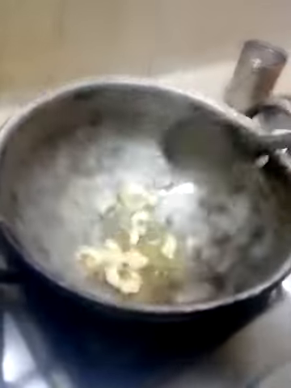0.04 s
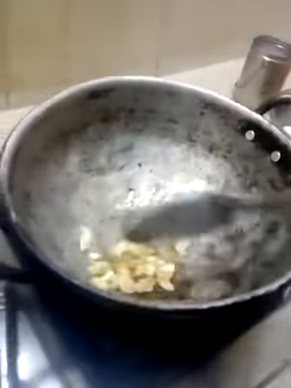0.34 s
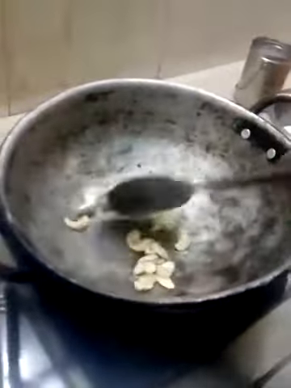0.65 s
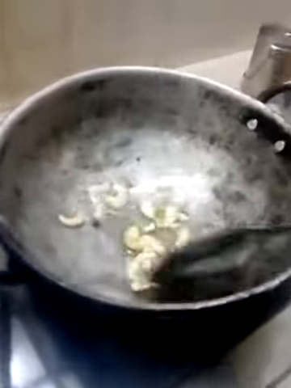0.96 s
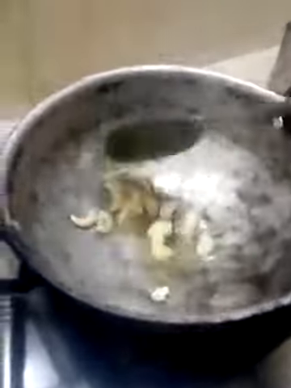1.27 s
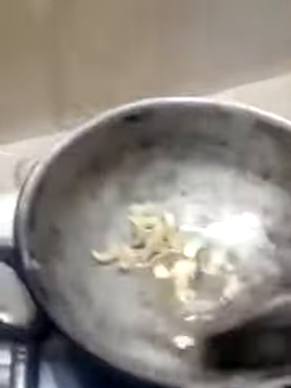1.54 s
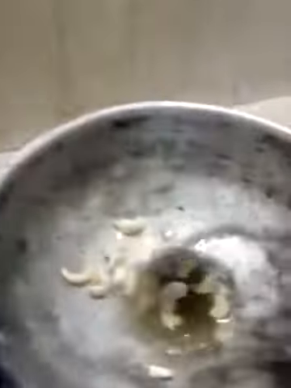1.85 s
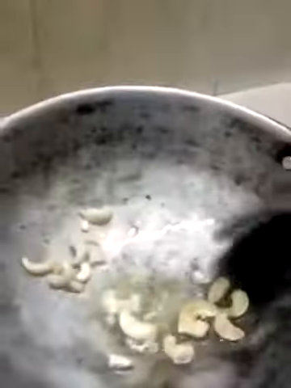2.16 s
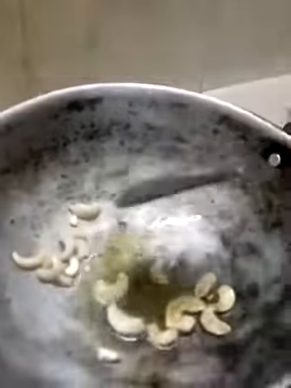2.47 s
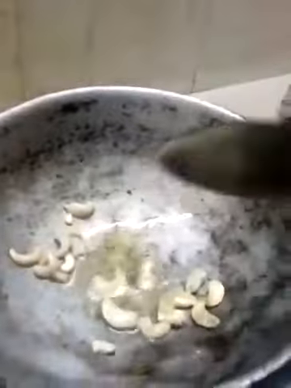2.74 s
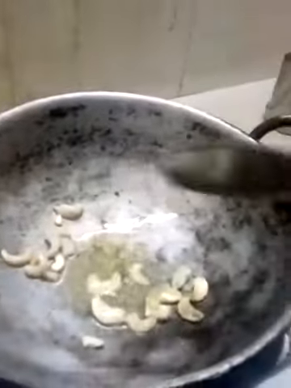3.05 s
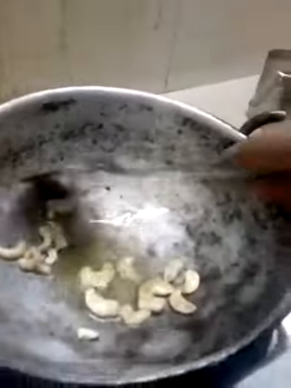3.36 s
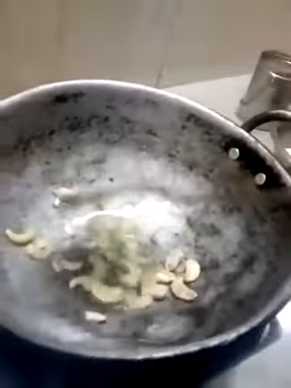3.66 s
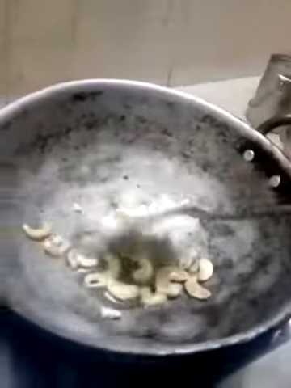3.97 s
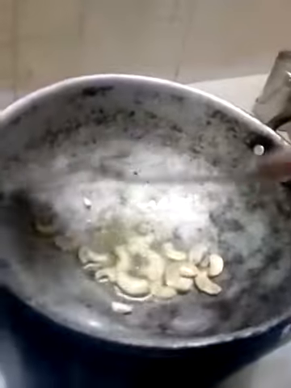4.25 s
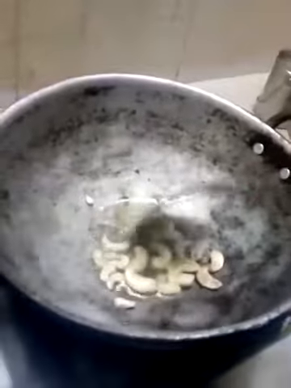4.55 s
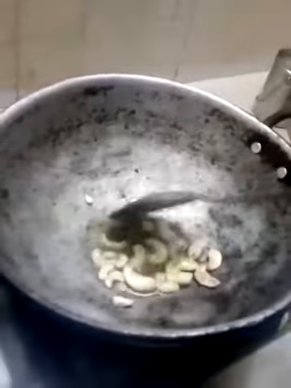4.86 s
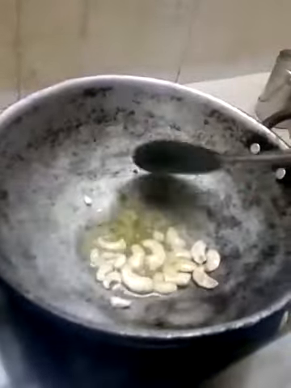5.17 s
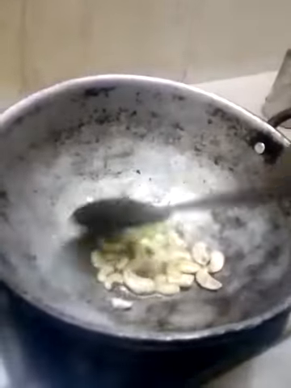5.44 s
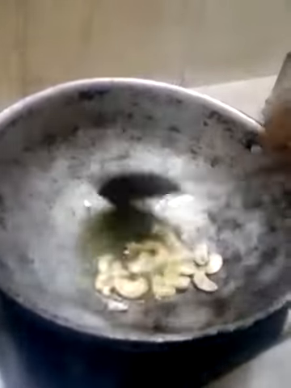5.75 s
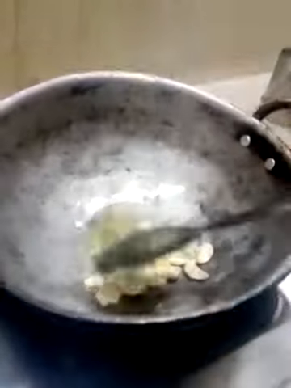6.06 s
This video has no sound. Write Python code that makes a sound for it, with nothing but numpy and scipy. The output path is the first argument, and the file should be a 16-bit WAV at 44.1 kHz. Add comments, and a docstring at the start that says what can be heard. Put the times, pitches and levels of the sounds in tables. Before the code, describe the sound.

Cashews sizzle and spit in hot oil while a steel spoon clinks and scrapes against a metal wok.

```python
"""Cashews sizzle in a little oil in a metal wok, close by in a small kitchen.
Tiny steam bubbles burst in the oil, and drops of moisture spit: a sharp pop, then a short
pitched fizz of escaping steam. A steel spoon clinks into the pan and scrapes along it.
A few wet whistles of steam sag in pitch. Behind it all are a short echo and a faint hum."""
import sys
import numpy as np
from scipy import signal
from scipy.fft import rfft, irfft, next_fast_len
from scipy.io import wavfile
from scipy.ndimage import map_coordinates

SR = 44100
rng = np.random.default_rng(int(sys.argv[2]) if len(sys.argv) > 2 else 0)


def wav_record(signal):
    """Record a signal, one row per channel, as 16-bit PCM in the file named by sys.argv[1]."""
    frames = np.transpose(np.atleast_2d(signal))
    bounded = np.clip(frames, -1, 1)
    # unit amplitude maps onto the largest positive 16-bit level
    quanta = np.round(bounded * 32767).astype(np.int16)
    wavfile.write(sys.argv[1], SR, quanta)


N = 269451

# How hard the oil fries, and its finest spray. Each row: time in seconds, level in dB.
SIZZLE_LEVELS = [(0, -53), (1.32, -56), (1.5, -33), (1.8, -33), (2.0, -33), (2.38, -38), (2.85, -38.5),
                 (3.15, -39.5), (3.45, -34.5), (4.04, -44), (4.2, -32), (4.5, -35.5), (4.72, -35),
                 (5.2, -32.5), (5.45, -29), (5.62, -25.5), (5.9, -33.5), (6.11, -27.5)]
MIST_LEVELS = [(0, -99), (1.3, -98.5), (1.43, -71), (1.85, -61), (2.45, -66), (3.1, -71.5), (4.0, -76),
               (4.25, -69), (6.11, -70)]
# The tone of the fizz and of the crackles. Each row: frequency in Hz, level in dB.
FIZZ_TONE = [(100, -14), (400, -3.5), (800, -14), (1500, -21.5), (2500, -2), (4000, 1.5), (5500, 10),
             (6600, -5.5), (8500, -15), (11000, -17), (15000, -14.5)]
CRACKLE_TONE = [(300, -39), (800, -12), (1500, 13.5), (3000, -1), (5000, 3), (6800, 3.5), (8500, -3),
                (15000, -28)]


def sizzle(stir):
    """Tiny steam bubbles burst in clumps: a fine fizz, pitched crackles and a thin mist on top."""
    fizz = coloured(grains(rate=12000, spread_db=2.5), FIZZ_TONE) * amp(2.5 * wobble(45))
    mist_tone = [(5000, -63), (8500, 3.5), (10500, 1.5), (15500, 8.5)]
    mist = coloured(grains(rate=3900, spread_db=8), mist_tone) * amp(2.1 * wobble(43))
    crackle, t = np.zeros(N), np.arange(SR // 16) / SR
    for when, size, pitch in rng.random((650, 3)):
        hz = 3400 * 1.75 ** pitch
        click = snap(t, 1.3 * hz, life_s=.0004, grit=.15)
        ping = amp(-14) * snap(t, hz, life_s=.007, grit=.13)
        add(crackle, when * N / SR, amp(-17 * np.sqrt(size)) * (click + ping))
    bubbles = amp(-5) * fizz + amp(-3) * coloured(crackle, CRACKLE_TONE)
    frying = gain_curve(SIZZLE_LEVELS) + amp(-1.5) * stir  # oil swept over hot metal sizzles more
    return frying * bubbles + amp(26) * gain_curve(MIST_LEVELS) * mist


# The loudest spits of the oil. Each row: start in seconds, pop level in dB, fizz pitch in Hz.
LOUD_SPITS = [(.703, -30, 4400), (1.8643, -16.5, 6060), (1.8948, -14, 5670), (1.9445, -11.5, 5250),
              (1.9717, -10, 4510), (2.2469, -13.5, 4540), (2.4013, -18, 4570), (2.4554, -15.5, 4650),
              (2.4901, -18, 2440), (2.5893, -25, 5580), (2.7045, -13.5, 3810), (2.801, -17.5, 2597),
              (2.8736, -11.5, 3210), (2.9734, -10, 5350), (3.025, -19, 5150), (3.1718, -15, 5370),
              (3.1834, -13, 5420), (3.3763, -14, 5430), (3.6546, -19, 4800), (3.7552, -24, 4030),
              (3.8543, -18, 6700), (4.074, -16, 5410), (4.139, -13.5, 5190), (4.2721, -13.5, 5880),
              (4.4759, -18.5, 5920), (4.8912, -11, 5480), (4.9547, -10.5, 5840), (4.9953, -11.5, 3670),
              (5.0463, -8.5, 3600), (5.26, -11, 5530), (5.3361, -11.5, 5660), (5.4025, -8.5, 5830),
              (5.4678, -12, 5330), (5.5039, -7.5, 4720), (5.5656, -6.5, 5750), (5.6334, -6.5, 5180),
              (5.6583, -7, 6560), (5.7663, -8.5, 6520), (5.8115, -6.5, 6270), (5.8616, -7.5, 4050),
              (5.9586, -9, 5260)]


def spits():
    """A drop pops and ticks the pan, then steam hisses out: big drops sing lower, purer and longer."""
    out, spray, tick = np.zeros((3, N))
    t = np.arange(SR // 5) / SR
    for start, pop_db, hz in list(LOUD_SPITS) + small_spits():
        size = 5000 / hz
        steam_db = 0.77 * pop_db  # hard pops are drier: the steam grows less than the pop
        pop = snap(t, 6350 * np.exp(0.047 * rng.standard_normal()), life_s=0.00072, grit=0.11)
        pitch = hz * (1 + 0.0307 * rng.standard_normal() * (1 - fade(t, 0.227)))
        jet = steam_hiss(pitch, width_hz=300 / size ** 2) * fade(t, 0.14 * size ** 1.8) / size
        add(out, start, amp(pop_db - 2.5) * pop + amp(steam_db - 17.5) * jet)
        add(spray, start, amp(pop_db - 20.5) * fade(t, .02) + amp(steam_db - 26) * fade(t, 0.11))
        add(tick, start, amp(pop_db - 29) * size * fade(t, 0.057))
    out += spray * coloured(rng.standard_normal(N), FIZZ_TONE)
    return out + tick * resonate(rng.standard_normal(N), PAN_NOTES)


def small_spits(per_second=12, over_sizzle_db=13.5, spread_db=3.5, hz=5440, spread_octaves=0.16):
    """Rows like LOUD_SPITS at random times, louder when the oil fries harder."""
    draws = rng.random((round(per_second * N / SR), 3))
    starts = draws[:, 0] * N / SR
    size, pitch = np.sqrt(12) * (draws[:, 1:].T - .5)
    pop_db = np.interp(starts, *np.transpose(SIZZLE_LEVELS)) + over_sizzle_db + spread_db * size
    return list(zip(starts, pop_db, hz * 2 ** (spread_octaves * pitch)))


def steam_hiss(pitch, width_hz):
    """Steam rushes through a pocket of oil: a fuzzy whistle that follows the given pitch."""
    noise = rng.standard_normal(len(pitch))
    flutter = filtered(noise, lambda hz: 1 / (1 + 1j * hz / width_hz) / (1 + 1j * hz / (4 * width_hz)))
    return unit(flutter * np.sin(2 * np.pi * np.cumsum(pitch) / SR))


# The ringing notes of the pan's bowl, of spoon and pan together, and of the pan rocking on the stove.
# Each row: pitch in Hz, width in Hz (narrow rings longer), level in dB.
PAN_NOTES = [(480, 150, -9), (610, 23, 0), (667, 14.6, -2.5), (746, 71, -2), (832, 29, 3), (917, 35, -2),
             (1001.7, 14.6, 1), (1100, 250, -13.5), (1508, 140, -13)]
STEEL_NOTES = [(1465, 50, -11), (2080, 70, -15), (2990, 60, -11), (3691, 14, 8), (3942, 28, -3),
               (4320, 45, -12), (4810, 40, -7), (5177, 28, 0), (5320, 30, -4), (5460, 35, -2),
               (5830, 150, -8), (6530, 45, -6), (7572, 12, -7), (8200, 16, -19)]
STOVE_NOTES = [(123, 21, -9.5), (209, 29, -8), (249.3, 13.7, 3), (319.4, 9.7, 3.5), (379.3, 13.4, -2.5)]
# The tone of the crack as the spoon lands. Each row: frequency in Hz, level in dB.
CRACK_TONE = [(60, -35), (400, -1), (8000, -2), (15000, -5)]
# The spoon lands. Each row: start in seconds, clink level in dB, clink pitch in Hz,
# then the levels in dB of the stove's thud, the pan's clang and the steel's ring.
SPOON_HITS = [(.366, -6.5, 6170, -39, -32.5, -18.5), (.839, -4, 5580, -40, -28.5, -35),
              (1.2516, -9, 5940, -24, -24, -28), (1.369, -20, 5800, -30.5, -19.5, -40),
              (1.990, -14.5, 4210, -45.5, -31, -33), (3.266, -10, 6000, -26, -17, -27.5),
              (3.417, -7, 5600, -40, -20.5, -25.5), (4.1868, -14.5, 6140, -22, -24, -55),
              (4.6506, -10.5, 6500, -31, -16.5, -26.5), (6.0909, -8, 5400, -30.5, -17, -23.5)]


def spoon_hits():
    """Each landing clinks, sets the steel ringing, clangs the bowl and thuds into the stove."""
    out, t = np.zeros(N), np.arange(SR // 2) / SR
    for start, clink_db, hz, thud_db, clang_db, ring_db in SPOON_HITS:
        # a hard tap favours the high notes; np.gradient tilts the ring that way
        ring = amp(ring_db + 3) * np.gradient(struck(t, STEEL_NOTES, t60=.2))
        clang = amp(clang_db - 4.5) * struck(t, PAN_NOTES, t60=0.19)
        thud = amp(thud_db - 2.5) * struck(t, STOVE_NOTES, t60=0.25)
        clink = amp(clink_db) * snap(t, hz, life_s=.0007, grit=.17)
        bounce = amp(clink_db - 4) * snap(t, hz, life_s=.0007, grit=.17)
        crack = amp(clink_db - 19) * fade(t, 0.13) * coloured(rng.standard_normal(len(t)), CRACK_TONE)
        add(out, start, clink + ring + clang + thud + crack)
        add(out, start + 0.0024, bounce)
    return out


# The spoon is pushed along the pan.
# Each row: start in seconds, length in seconds, drone level in dB, rasp level in dB.
SPOON_STROKES = [(-.03, 0.14, -35.5, -35.5), (0.383, 0.14, -33, -31), (0.842, 0.13, -31, -30.5),
                 (1.364, 0.089, -33.5, -30), (1.531, 0.18, -38, -52), (1.987, 0.013, -37, -35.5),
                 (3.424, 0.084, -36, -33), (4.088, 0.035, -39, -49.5), (4.238, 0.12, -30, -40.5),
                 (4.649, .21, -35, -40.5), (4.938, .14, -32.5, -45), (5.203, 0.22, -33, -45.5),
                 (5.527, 0.0081, -32.5, -31.5), (5.62, 0.18, -35, -55)]


def stirring(press_s=0.033, bite_s=0.0013):
    """How loud the scraping is: the drone builds as the hand presses; the rasp starts at once."""
    clock = np.arange(N) / SR
    drone, rasp = np.zeros((2, N))
    for start, length, drone_db, rasp_db in SPOON_STROKES:
        t = np.maximum(clock - start, 0)
        since_lift = np.maximum(t - length, 0)  # both die away once the spoon lifts
        wetting_db = 35.5 * t  # the rasp fades as oil coats the edge
        drone += (1 - np.exp(-t / press_s)) * amp(drone_db - 190 * since_lift)
        rasp += (1 - np.exp(-t / bite_s)) * amp(rasp_db - wetting_db - 200 * since_lift)
    return drone, rasp


# The tone of a scrape's low drone and dry rasp. Each row: frequency in Hz, level in dB.
DRONE_TONE = [(30, -39), (70, -4), (125, -15), (165, -10), (260, 3), (470, -4), (650, 3.5), (950, 3),
              (1250, -11.5), (2500, -102), (8000, -57)]
RASP_TONE = [(40, -45), (300, -4), (1200, -2.5), (2400, -0.5), (4500, -1.5), (5500, 8), (6600, 0),
             (8000, -13), (15000, -15)]
# Nuts and oil cushion the spoon more and more. Each row: time in seconds, ringing level in dB.
CUSHIONING = [(1.8, -0.5), (3.5, -1), (4.8, -11)]


def scrapes(drone, rasp):
    """The spoon's edge catches on rough metal: the pan drones, and dry steel rasps and sings."""
    slips = grains(rate=2200, spread_db=4.5) * amp(3.04 * wobble(70))
    bare_metal = gain_curve(CUSHIONING)
    bowl = amp(-2.5) * resonate(slips, PAN_NOTES)
    stove = amp(-0.5) * bare_metal * resonate(slips, STOVE_NOTES)
    rub = amp(-2) * coloured(grains(rate=2500, spread_db=4.5), DRONE_TONE)
    song = amp(2) * bare_metal * resonate(slips, STEEL_NOTES) * amp(1.5 * wobble(50))
    grit = coloured(grains(rate=2500, spread_db=1), RASP_TONE)
    return drone * (bowl + stove + rub) + rasp * amp(8) * (song + grit)


# Short, wet, fizzing whistles of steam in the oil.
# Each row: start in seconds, length in seconds, starting pitch in Hz, level in dB.
STEAM_WHISTLES = [(4.706, 0.046, 3890, -36), (4.758, 0.046, 2967, -39.5), (5.01, .04, 3820, -38),
                  (5.056, 0.0583, 3600, -29.5), (5.156, .16, 3500, -43), (5.277, 0.052, 4040, -36.5),
                  (5.56, 0.079, 4730, -27.5), (5.867, 0.071, 3670, -34.5)]


def steam_whistles(sag=0.088):
    """Steam fizzes out through the oil in short whistles that swell, fade and sag in pitch."""
    out = np.zeros(N)
    for start, length, hz, db in STEAM_WHISTLES:
        progress = np.linspace(0, 1, round(length * SR))
        swell = np.sqrt(4 * progress * (1 - progress))
        add(out, start, amp(db + 3.5) * swell * steam_hiss(hz * (1 - sag * progress), width_hz=130))
    return out


# How long the echo lasts. Each row: frequency in Hz, seconds to fade by 60 dB.
ECHO_TIMES = [(150, 0.6), (1000, 0.43), (5000, 0.47), (12000, 0.12)]


def wall_echo(x):
    """The hard walls answer with a short tail of echo."""
    hz, t, bands = signal.stft(rng.standard_normal(SR // 2), SR, nperseg=256)
    tail = signal.istft(bands * fade(t, along(ECHO_TIMES, hz)[:, None]), SR, nperseg=256)[1]
    delayed = np.pad(tail / np.linalg.norm(tail), (SR // 250, 0))
    return signal.fftconvolve(x, delayed)[:N]


# The tone of the kitchen's background noise. Each row: frequency in Hz, level in dB.
KITCHEN_TONE = [(20, -2), (45, -15), (75, 5), (120, 7.5), (170, 1), (270, 3.5), (500, -10), (900, -4.5),
                (1600, -15.5), (5000, -18.5), (15000, -32)]


def kitchen():
    """The room's low rush and a faint mains hum."""
    hum = np.sin(2 * np.pi * 100.5 * np.arange(N) / SR) * amp(1.3 * wobble(4.5))
    return amp(-51) * coloured(rng.standard_normal(N), KITCHEN_TONE) + amp(-53) * hum


def amp(db):
    """Turn decibels into a gain to multiply by."""
    return 10 ** (np.asarray(db) / 20)


def gain_curve(levels):
    """Join (seconds, dB) rows into a gain for every sample."""
    return amp(np.interp(np.arange(N) / SR, *np.transpose(levels)))


def unit(x):
    """Scale x to an average strength (rms) of 1."""
    return x / np.sqrt(np.mean(x ** 2) + 1e-20)


def along(points, hz):
    """Read between (Hz, value) rows on a log frequency scale."""
    freqs, values = np.transpose(points)
    return np.interp(np.log(hz + 1), np.log(freqs + 1), values)


def wobble(rate):
    """A smooth curve through `rate` random points a second."""
    return map_coordinates(rng.standard_normal(int(N * rate / SR) + 4), [np.arange(N) * rate / SR])


def filtered(x, response):
    """Multiply each frequency in x by response(hz)."""
    size = next_fast_len(len(x) + SR // 4)
    return irfft(rfft(x, size) * response(np.fft.rfftfreq(size, 1 / SR)), size)[:len(x)]


def coloured(x, tone):
    """Give x the tone of a (Hz, dB) table, at strength 1."""
    return unit(filtered(x, lambda hz: amp(along(tone, hz))))


def resonate(x, notes):
    """Let x shake metal that rings at the given notes, at strength 1."""
    def response(f):
        return sum((-1) ** k * amp(db) * 1j * f * width / (hz * hz - f * f + 1j * f * width)
                   for k, (hz, width, db) in enumerate(notes))
    return unit(filtered(x, response))


def struck(t, notes, t60):
    """Metal rings from one blow and a dying chatter, at strength 1 over the first 25 ms."""
    force = rng.standard_normal(len(t)) * fade(t, t60)
    force[0] = 0.72 * np.linalg.norm(force)
    ring = resonate(force, notes)
    return ring / np.sqrt(np.mean(ring[:SR // 40] ** 2))


def grains(rate, spread_db):
    """Random clicks of uneven size, about `rate` a second, at strength 1."""
    clicks = (rng.random(N) < rate / SR) * rng.choice([-1, 1], N)
    return unit(clicks * amp(spread_db * rng.standard_normal(N)))


def snap(t, hz, life_s, grit):
    """A tiny tone that swells until life_s, then dies; grit makes its pitch unsteady."""
    drift = grit * np.cumsum(rng.standard_normal(len(t)))
    swell = t / life_s * np.exp(1 - t / life_s)
    return swell * np.sin(2 * np.pi * (hz * t + rng.random()) + drift)


def fade(t, t60):
    """Die away by 60 dB every t60 seconds."""
    return np.exp(-np.log(1000) * t / t60)


def add(track, start, sound):
    """Mix a sound into the track at `start` seconds."""
    part = track[max(round(start * SR), 0):][:len(sound)]
    part += sound[:len(part)]


def scene():
    """Oil, spoon and pan in the kitchen."""
    drone, rasp = stirring()
    pan = sizzle(rasp) + spits() + steam_whistles() + spoon_hits() + scrapes(drone, rasp)
    return (pan + amp(-10.5) * wall_echo(pan) + kitchen())[None]


# The microphone's tone. Each row: frequency in Hz, gain in dB.
MICROPHONE_TONE = [(20, -7), (6600, -0.5), (7200, -2.5), (8500, -3), (10000, -13.5), (13800, -19.5),
                   (14800, -15), (15600, -12)]


def record(dry):
    """The microphone dulls the top treble and keeps nothing above its upper limit."""
    top_hz = 15550
    return filtered(dry[0], lambda hz: amp(along(MICROPHONE_TONE, hz)) * (hz < top_hz))[None]


dry = scene()
out = record(dry)
wav_record(out)
```